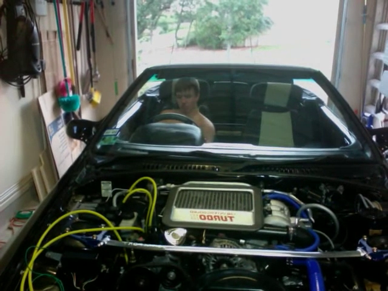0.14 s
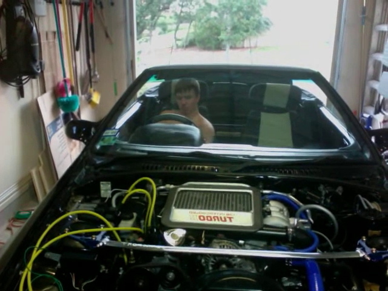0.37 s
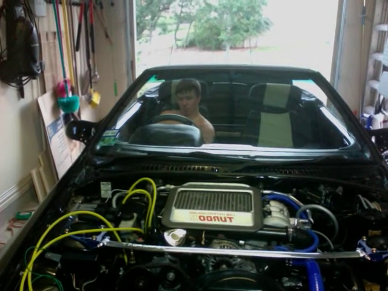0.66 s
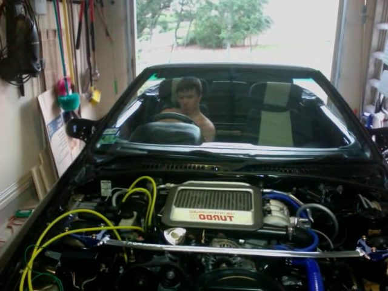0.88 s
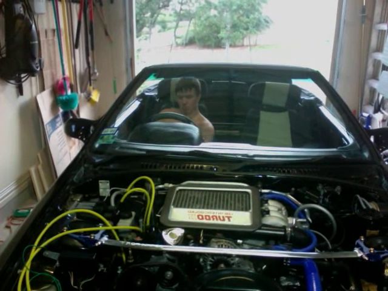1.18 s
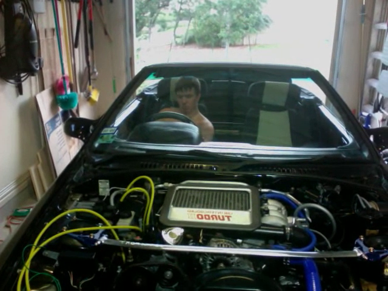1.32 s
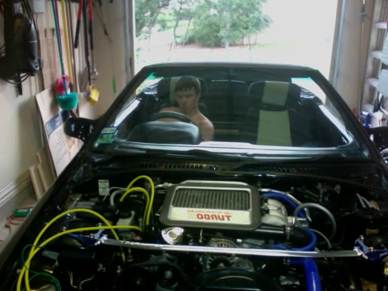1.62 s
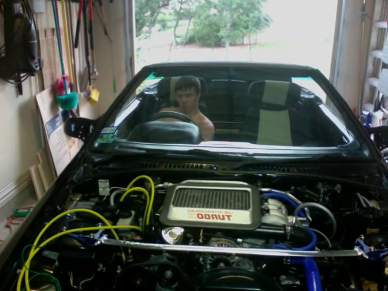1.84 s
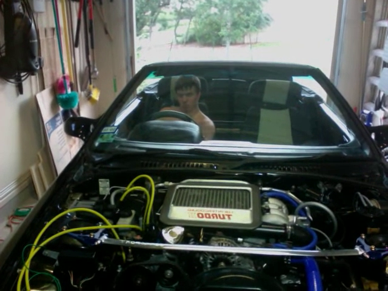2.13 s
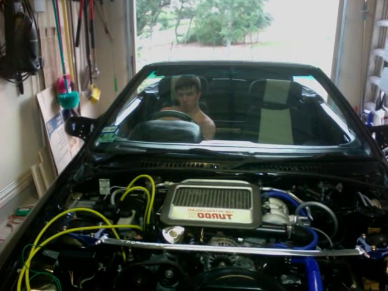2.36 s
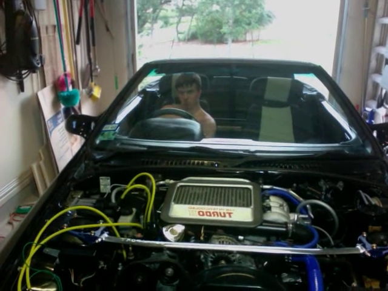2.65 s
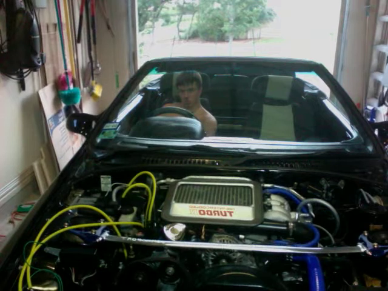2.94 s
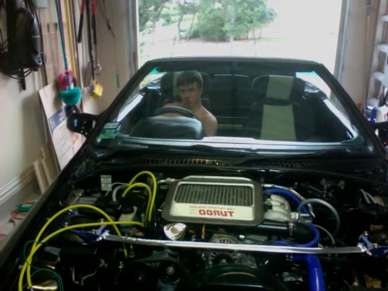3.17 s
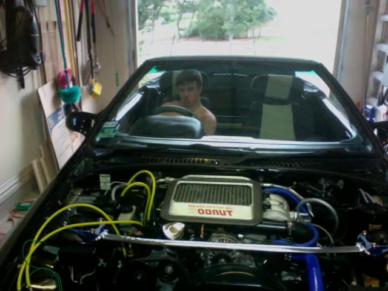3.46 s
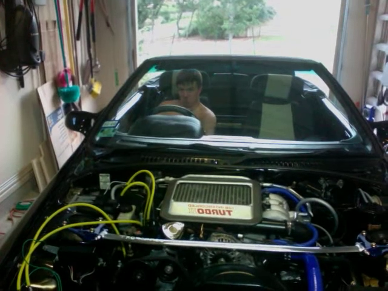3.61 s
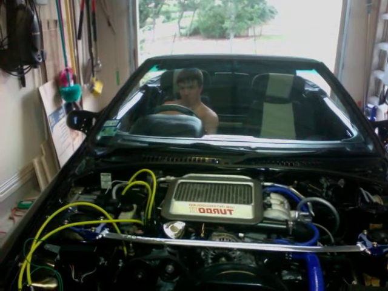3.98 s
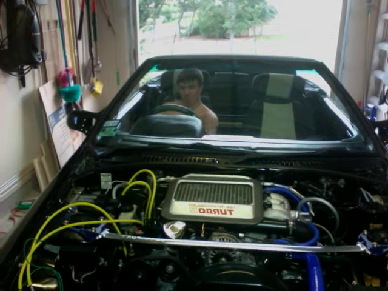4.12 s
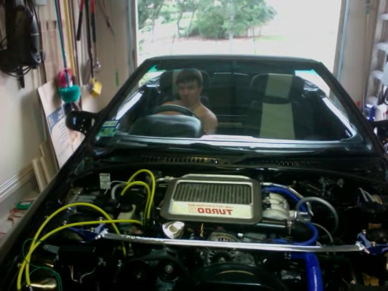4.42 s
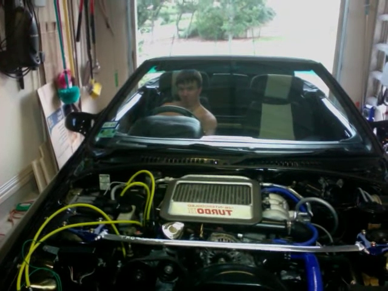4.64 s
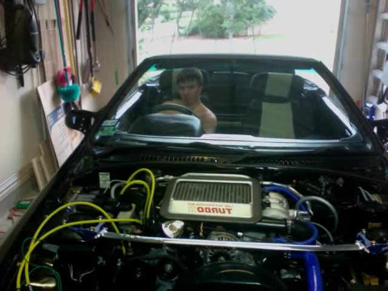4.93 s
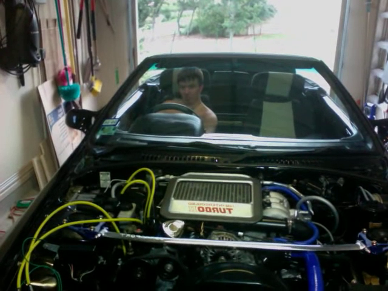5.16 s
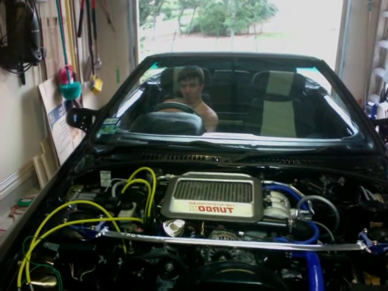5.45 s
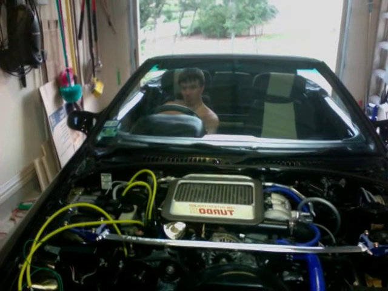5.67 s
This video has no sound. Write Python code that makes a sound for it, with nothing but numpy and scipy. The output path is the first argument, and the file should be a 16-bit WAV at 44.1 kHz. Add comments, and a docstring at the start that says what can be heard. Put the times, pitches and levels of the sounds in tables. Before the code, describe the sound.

A turbocharged rotary engine winds down from a rev, lurches back into a lumpy, misfiring idle, then shuts off with a small metallic clink.

```python
"""Exhaust thuds of a turbocharged two-rotor engine: it coasts down from a rev, catches again, idles with
many missed firings and is switched off in a garage. Each firing rings the exhaust pipe modes; resonant
noise makes the gas rush and drone. In the engine bay, noise through ringing castings makes the rattle
and a fuzzy moving tone the turbo whine. Decaying sines make a brief jingle and a last small metal clink;
faint coloured noise is the garage air."""
import sys
import numpy as np
from scipy import signal
from scipy.fft import rfft, irfft, next_fast_len
from scipy.io import wavfile
from scipy.ndimage import uniform_filter1d

SR = 44100
rng = np.random.default_rng(int(sys.argv[2]) if len(sys.argv) > 2 else 0)


def voltage_ratio(level):
    """Linear amplitude factor for a level in decibels (scalar or array-like)."""
    return 10 ** (np.asarray(level, float) / 20)


def dump_mix(stems):
    """Bounce the given channels to the path in sys.argv[1] as a 16-bit WAV at rate SR."""
    frames = np.atleast_2d(stems).T  # one column per channel
    limited = np.clip(frames, -1, 1)  # hard clip at full scale
    pcm = np.round(limited * 32767).astype(np.int16)
    wavfile.write(sys.argv[1], SR, pcm)


N = 255339

# firings that catch: start_s, thud_db, upper_db (upper pipe modes relative to thud),
# rasp_db (gas blast relative to thud, before a small trim)
FIRINGS = [(0.4772, -35, -4, -27), (0.6146, -35.5, -10, -26), (0.752, -35, -11, -29), (0.8141, -25, 1, -34),
           (0.8755, -27.5, 3.5, -42), (0.9312, -27, 1.5, -22), (0.9862, -24.5, 1, -27),
           (1.034, -23.5, 2, -28), (1.0774, -22.5, -3, -19.5), (1.1211, -27, 7.5, -10.5),
           (1.1622, -22, -1, -16.5), (1.244, -22, 2, -22), (1.29, -35, -15, -29), (1.327, -24.5, 5, -18.5),
           (1.415, -24.5, 2.5, -35), (1.504, -25, 3.5, -23), (1.599, -27, 7.5, -26),
           (1.6467, -25, 3.5, -28), (1.695, -24.5, 0, -36), (1.7915, -27, 2.5, -33),
           (1.8362, -22.5, 5, -25), (1.8805, -22.5, 3.5, -20), (1.9728, -26, 2, -19),
           (2.0173, -22, 5.5, -27.5), (2.063, -22.5, 0, -41), (2.1573, -24.5, 1, -24),
           (2.259, -26.5, 2, -24), (2.3609, -33, 2, -21), (2.4695, -38, 7, -37), (2.5236, -25, 0, -34),
           (2.575, -28, -0.5, -36), (2.6256, -27.5, 2, -23.5), (2.6747, -29, -4, -31),
           (2.72, -23.5, 2, -36), (2.7652, -24.5, 3, -28), (2.8547, -28, -1.5, -15),
           (2.9445, -28, 1.5, -13.5), (3.0358, -30, -1, -13), (3.1297, -33, 1.5, -18),
           (3.1793, -39, 0, -13), (3.229, -28.5, -4.5, -36), (3.2884, -31, -7, -37),
           (3.3287, -33, -18, -24), (3.3726, -27.5, -4, -25), (3.418, -27, -3, -22), (3.5108, -33, 4.5, -9),
           (3.6034, -34.5, 3, -13.5), (3.7015, -36.5, 4, -11.5), (3.8021, -37.5, 5, -28),
           (3.9039, -38.5, 5, -27), (3.9535, -33.5, 1, -20), (4.003, -38, 0, -19), (4.103, -43, 0, -37),
           (4.149, -31.5, 0.5, -26), (4.1941, -30, -3, -31), (4.2861, -35, 0, -18), (4.3304, -27, 6, -25),
           (4.3743, -27, 1.5, -20.5), (4.4625, -34, -3, -37), (4.5073, -26, 1.5, -42),
           (4.5546, -26, -5.5, -36), (4.654, -37.5, 2, -25), (4.759, -40.5, 9, -16),
           (4.8723, -41.5, 6, -27), (4.9874, -46, 6, -15)]
# engine speed and metal rattle over time: time_s, speed_per_s (firing chances per second), rattle_db
ENGINE = [(0, 26, -54), (.3, 22.3, -50.5), (.5, 16.7, -51.5), (.75, 14.3, -57.5), (.9, 18.7, -51.5),
          (1.12, 23.9, -44.5), (1.3, 26.7, -45.5), (1.65, 22.5, -46), (2, 23.6, -45.5), (2.45, 18.7, -48),
          (2.8, 21.4, -47.5), (3.1, 21.3, -47), (3.4, 21.2, -48), (3.85, 19.8, -50.5), (4.1, 18, -52.5),
          (4.45, 21.9, -47.5), (4.75, 19.9, -49.5), (4.95, 16.3, -53), (5.1, 13.8, -55.5), (5.2, 16, -61),
          (5.31, 9.9, -71.5), (5.44, 2.9, -87)]
IDLE_PER_S, IDLE_RATTLE_DB = 21, -47
# how the gas rush follows the engine: dB at idle, dB per doubling of speed, share of the rattle's dB change
RUSH = (-54, 12.3, 0.42)


def evened(x):
    """Scales to rms 1."""
    return x / np.sqrt(np.mean(x ** 2) + 1e-20)


def add(mix, start_s, sound):
    """Mixes a sound in at its start time, cut at the end of the scene."""
    part = mix[round(start_s * SR):][:len(sound)]
    part += sound[:len(part)]


def curves(rows):
    """Columns of a time table, interpolated to one value a sample."""
    time_s, *columns = np.transpose(rows)
    return [np.interp(np.arange(N) / SR, time_s, column) for column in columns]


def coloured(x, gain):
    """Filters x by a gain that is a function of Hz."""
    size = next_fast_len(N)
    return irfft(rfft(x, size) * gain(np.fft.rfftfreq(size, 1 / SR)), size)[:N]


def read(points, hz):
    """Gain of a (Hz, dB) spectrum, interpolated over log frequency."""
    point_hz, point_db = np.transpose(points)
    return voltage_ratio(np.interp(np.log(hz + 1), np.log(point_hz + 1), point_db))


def peaks(modes, hz, steep=1):
    """Joint gain of (Hz, width Hz, dB) resonances, their powers summed."""
    power = sum(voltage_ratio(2 * db) / (1 + (2 * (hz - mode_hz) / width_hz) ** 2) ** steep
                for mode_hz, width_hz, db in modes)
    return np.sqrt(power)


def band(x, low_hz, high_hz):
    """One band of x at rms 1."""
    return evened(coloured(x, lambda hz: 1 / np.hypot(1, (low_hz / (hz + 1)) ** 6)
                           / np.hypot(1, (hz / high_hz) ** 6)))


def lumps(seconds, depth_db):
    """Random unevenness of level, lumps about that long."""
    size = max(round(seconds * SR), 1)
    smooth = uniform_filter1d(uniform_filter1d(rng.standard_normal(N), size), size)
    return voltage_ratio(depth_db * evened(smooth))


def echoed(x, wet_db, t60):
    """Direct sound and a short dense tail off bonnet, floor and walls."""
    t = np.arange(round(.2 * SR)) / SR
    tail = rng.standard_normal(len(t)) * voltage_ratio(-60 * t / t60) * (1 - np.exp(-t / 0.0028))
    tail *= voltage_ratio(wet_db) / np.linalg.norm(tail)
    tail[0] = 1  # direct sound
    return signal.oaconvolve(x, tail / np.linalg.norm(tail))[:N]


def running():
    """1 while the shaft turns, fading after the last row of the engine table."""
    fade_s = 0.24
    return np.clip(1 - (np.arange(N) / SR - ENGINE[-1][0]) / fade_s, 0, 1)


def following(law):
    """Level in dB of a layer that follows shaft speed and rattle by a law laid out as RUSH."""
    speed, rattle_db = curves(ENGINE)
    idle_db, doubling_db, share = law
    return idle_db + doubling_db * np.log2(speed / IDLE_PER_S) + share * (rattle_db - IDLE_RATTLE_DB)


def firing_thuds():
    """Each firing rings the pipe while the port is open; shutting it chokes the ring. Also gives the blast."""
    # exhaust pipe modes, lowest strong mode first: pitch_hz, level_db, t60_s, polarity
    pipe_modes = [(106.7, -0.4, 0.48, 0.89), (89, -17, 0.081, -0.58), (169.7, 8, 0.042, -0.72),
                  (256.5, -19, 0.43, 0.68), (322, -15, 0.14, -0.66)]
    rise_s, open_s, shut_s, leak_db = .0053, .0535, .002, -13
    t = np.arange(round(.12 * SR)) / SR
    shut = 1 / (1 + np.exp((open_s - t) / shut_s))
    # what still rings after the port shuts, tapered to nothing
    leak = voltage_ratio(leak_db - 60 * t / 0.44) * np.cos(np.pi / 2 * t / t[-1])
    port = (1 - np.exp(-t / rise_s)) * (1 - shut + shut * leak)
    lowest, *upper = (polarity * voltage_ratio(db - 60 * t / t60) * np.sin(2 * np.pi * hz * t)
                      for hz, db, t60, polarity in pipe_modes)
    thuds, blast = np.zeros(N), np.zeros(N)
    leans = rng.standard_normal((len(FIRINGS), len(upper)))  # each firing weighs the upper modes anew
    for (start_s, thud_db, upper_db, rasp_db), lean in zip(FIRINGS, leans):
        ring = lowest + voltage_ratio(upper_db + 2.1 * lean) @ upper
        add(thuds, start_s, voltage_ratio(thud_db) * port * ring)
        puff = port * (1 - np.exp(-t / 0.009))
        add(blast, start_s, voltage_ratio(thud_db + rasp_db - 1.0 - 60 * t / 0.46) * puff)
    return thuds, blast


def gas_rasp(blast):
    """Turbulent gas sounds the silencer: a blast at each firing over a steadier rush."""
    # silencer resonances: pitch_hz, width_hz, level_db
    silencer_modes = [(248, 68, -6.5), (291.4, 18, 1.5), (367.4, 23, 4.5), (424, 160, -2), (494, 25, 1),
                      (520.6, 23, 0), (571, 73, -4.5), (618, 25, 1), (819, 54, -12)]
    rush = evened(coloured(rng.standard_normal(N), lambda hz: peaks(silencer_modes, hz, steep=1.8)))
    # fast gas favours the higher resonances
    jet = evened(coloured(rush, lambda hz: 1 / np.hypot(1, (480 / (hz + 1)) ** 5)))
    return lumps(0.007, depth_db=1) * (jet * blast + rush * voltage_ratio(following(RUSH)) * running())


def drone_gain():
    """Grows with the share of recent chances that fired; the rev's drone dies away first."""
    none_missed_db, all_missed_db, memory_s = -44, -16.5, 0.25  # level at idle, change when all miss
    coast_db, coast_db_per_s = -45, -47  # dying away after the rev
    fired, size = np.zeros(N), round(memory_s * SR)
    fired[[round(row[0] * SR) for row in FIRINGS]] = SR
    firings_per_s = uniform_filter1d(uniform_filter1d(fired, size), size // 2)
    share = np.clip(firings_per_s / curves(ENGINE)[0], 0, 1)
    steady_db = following(RUSH) - RUSH[0] + none_missed_db + all_missed_db * (1 - share)
    return np.hypot(voltage_ratio(steady_db), voltage_ratio(coast_db + coast_db_per_s * np.arange(N) / SR))


def pipe_drone():
    """Noise on two broad low resonances: the pipe drones when firings follow without misses."""
    modes = [(110.0, 25.0, 0), (177.0, 57, -6)]  # Hz, width Hz, dB
    drone = evened(coloured(rng.standard_normal(N), lambda hz: peaks(modes, hz, steep=2.08)))
    return drone * drone_gain() * running() * lumps(0.14, depth_db=1.5)


def exhaust():
    """Pipe thuds, rasping gas and drone together."""
    thuds, blast = firing_thuds()
    return thuds + gas_rasp(blast) + pipe_drone()


def bay_body(hz):
    """Gain of the ringing metal that rattle and whine both shake."""
    # spectrum between the resonances: pitch_hz, level_db (per Hz)
    bay_colour = [(400, -28.5), (750, -5.5), (1500, -20), (2500, -18.5), (4000, -9), (6000, -17),
                  (9000, -27), (11500, -37.5), (13000, -49), (15500, -55)]
    # ringing metal parts: pitch_hz, width_hz, level_db
    castings = [(815, 17, -5), (1283, 260, -10), (1737, 120, -10.5), (2220, 250, -7), (2777, 190, -12.5),
                (3030, 180, -14), (3596, 39, -13), (3996, 29, -6), (3902, 38, 1.5), (3700, 260, -15.5),
                (3980, 18, -4), (4120, 23, 2.5), (4702, 324, -2), (5520, 61, -9), (5750, 19, -22),
                (5640, 220, -14), (6310, 22.4, 0.5), (6240, 33, -3), (6590, 20, -2), (6250, 380, -5.5),
                (6734, 12.5, -20), (6390, 26, -2.5), (7196, 114, -7.5), (7486, 180, -7.5),
                (7900, 200, -14.5), (8370, 242, -16), (9020, 366, -14.5), (10010, 540, -20),
                (11170, 98, -25), (14076, 160, -40)]
    return np.hypot(read(bay_colour, hz), peaks(castings, hz, steep=1.33))


def metal_rattle(rattle_db):
    """Dense chatter through the castings, in bands that follow the engine, relative to the main band."""
    # laws laid out as RUSH
    treble_db = following((-59, 19, 0.22)) - rattle_db
    lower_castings_db = following((-57.5, 8.1, 0.11)) - rattle_db
    low_mids_db = following((-56.5, 9.2, 0.55)) - rattle_db
    top_hiss_db = following((-77.5, 16, 0.44)) - rattle_db
    grain = lumps(0.00046, depth_db=0.5) * lumps(0.053, depth_db=0.64)
    chatter = coloured(rng.standard_normal(N) * grain, bay_body)
    rattle = band(chatter, 3660, 8240)
    rattle += voltage_ratio(treble_db) * band(chatter, 11340, 12300)
    rattle += voltage_ratio(top_hiss_db) * band(chatter, 13000, 18000)
    rattle += voltage_ratio(lower_castings_db) * band(chatter, 2200, 2806)
    rattle += voltage_ratio(low_mids_db) * band(chatter, 300, 1705)
    return rattle


def whine(hz, width_hz):
    """A fuzzy whistle: slow complex noise carried on the moving pitch."""
    pole = np.exp(-np.pi * width_hz / SR)
    noise = rng.standard_normal(N) + 1j * rng.standard_normal(N)
    fuzz = signal.lfilter([1], np.poly([pole, pole]), noise)
    return evened((fuzz * np.exp(2j * np.pi * np.cumsum(hz) / SR)).real)


def turbo_whine():
    """Second and third order of the turbo, relative to the rattle, ringing the castings."""
    # turbo over time: time_s, whine_hz (before wavering), whine_db and third_order_db
    # (both relative to rattle, before the castings colour them)
    turbo_curve = [(0, 9550, 0, -17), (.12, 9250, 2, -17), (.3, 8950, 4, -16), (.37, 7950, -10, -30),
                   (.45, 6400, 3, -20), (.55, 6250, -14, -30), (.7, 5004, -16, -22), (1, 6500, -18, 0),
                   (1.1, 7150, -15, 3), (1.22, 7620, -3, 9), (1.33, 7350, -3, 3), (1.55, 7050, -12, 1),
                   (1.75, 6850, -16, -8), (2.4, 6750, -18, -10), (3, 6340, -10, -12), (4.2, 6200, -13, -13),
                   (4.6, 6570, -10, -14), (5.45, 4800, -22, -24)]
    hz, whine_db, third_db = curves(turbo_curve)
    hz = hz * lumps(.03, depth_db=.12)  # the whine wavers
    second = whine(hz, 570) * lumps(0.023, depth_db=2.0)  # it breaks up as the flow stutters
    third = whine(1.5 * hz, 150) * lumps(0.017, depth_db=2.5)
    orders = voltage_ratio(whine_db) * second + voltage_ratio(third_db) * third
    return coloured(orders, bay_body) / bay_body(6443)


def engine_bay():
    """Metal chatter and turbo whine share one level curve and the echo around the bay."""
    rattle_db = curves(ENGINE)[1]
    dry_bay = voltage_ratio(rattle_db) * (metal_rattle(rattle_db) + turbo_whine())
    return running() * echoed(dry_bay, wet_db=-7, t60=.15)


def jingle():
    """Thin metal jingles as the engine lurches back up: sparse random taps on slightly detuned parts."""
    # thin loose parts, before detuning: pitch_hz, level_db, t60_s
    jingle_modes = [(11900, -2, .03), (12450, 0, .03), (13200, -4, .03), (13600, 0, .04), (14300, -3, .03),
                    (15100, -4, .03)]
    start_s, rise_s, hold_s, level_db, fade_db_per_s = 1.04, .05, .3, -57.5, -65
    since = np.arange(N) / SR - start_s
    shaking = np.clip(since / rise_s, 0, 1) * voltage_ratio(fade_db_per_s * np.maximum(since - hold_s, 0))
    t, out = np.arange(round(.05 * SR)) / SR, np.zeros(N)
    for hz, db, t60 in jingle_modes:
        for detune in (.975, 1, 1.03):
            taps = (rng.random(N) < 30 / SR) * voltage_ratio(3 * rng.standard_normal(N))  # about 30 a second
            ping = voltage_ratio(db - 60 * t / t60) * np.sin(2 * np.pi * hz * detune * t) * (1 - np.exp(-t / .002))
            out += signal.oaconvolve(taps, ping)[:N]
    return voltage_ratio(level_db) * shaking * out


def clink():
    """Small metal parts scrape and knock together a few times as the engine stops."""
    # knocks: start_s, level_db (before the ring and scrape trims), tilt_db_per_khz (of modes about 7 kHz)
    clink_hits = [(5.5343, -49, 1.5), (5.5425, -50, .5), (5.5512, -45, -1.5), (5.564, -45.5, -.5),
                  (5.575, -49, -1), (5.585, -58, -1)]
    # ringing modes: pitch_hz, level_db (before tilt), t60_s
    clink_modes = [(4950, -19, .035), (5814, -3, .05), (6541, 2, .08), (7418, -12, .04), (8560, -14, .1),
                   (8769, -3, .06), (6200, -17, .03), (7750, -19, .02), (9250, -20, .03), (9550, -21, .03),
                   (11250, -23, .02), (11950, -27, .015), (12400, -27, .015), (14150, -31, .015),
                   (14800, -29, .015)]
    t, out = np.arange(round(.3 * SR)) / SR, np.zeros(N)
    grit = band(rng.standard_normal(N), 4800, 9300)
    phases = rng.random((len(clink_hits), len(clink_modes)))  # cycles
    for (start_s, hit_db, tilt_db), phase in zip(clink_hits, phases):
        ring = 0
        for (hz, mode_db, t60), cycle in zip(clink_modes, phase):
            tilted_db = mode_db + tilt_db * (hz - 7000) / 1000
            ring = ring + voltage_ratio(tilted_db - 60 * t / t60) * np.sin(2 * np.pi * (hz * t + cycle))
        add(out, start_s, voltage_ratio(hit_db - 2.0) * ring * (1 - np.exp(-t / 0.0029)) ** 2)
        piece = grit[round(start_s * SR):][:len(t)]
        since = t[:len(piece)]
        scrape = piece * voltage_ratio(-26 - 60 * since / .06) * (1 - np.exp(-since / 0.0035))
        add(out, start_s, voltage_ratio(hit_db) * scrape)
    return echoed(out, wet_db=-3, t60=.08)


def garage_air():
    """Faint uneven background of the open garage: coloured noise."""
    # background spectrum, shape only: pitch_hz, level_db (per Hz)
    garage_spectrum = [(30, -49), (125, -5), (206, -4), (466, 4), (784, -4), (1200, -5.5), (2060, -5),
                       (2850, -10.5), (6000, -17.5), (9600, -29), (9900, -15), (10300, -29), (11500, -39),
                       (15000, -44)]
    noise = rng.standard_normal(N) * lumps(0.0083, depth_db=-0.2)
    return voltage_ratio(-73.5) * evened(coloured(noise, lambda hz: read(garage_spectrum, hz)))


def scene():
    """One microphone feeds both channels."""
    mono = exhaust() + engine_bay() + jingle() + clink() + garage_air()
    return np.tile(mono, (2, 1))


def roll_off(x):
    """The treble ends steeply here."""
    return signal.sosfilt(signal.butter(12, 15660, fs=SR, output="sos"), x)


def record(dry):
    """The microphone loses the deep bass below about 55 Hz."""
    thin = signal.sosfilt(signal.butter(2, 55, "high", fs=SR, output="sos"), dry)
    return roll_off(thin)


dry = scene()
out = record(dry)
dump_mix(out)
```